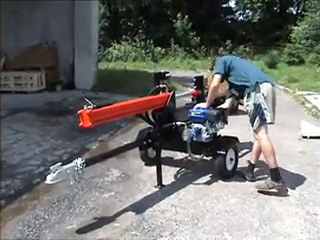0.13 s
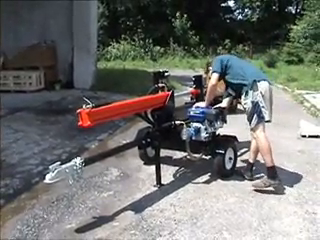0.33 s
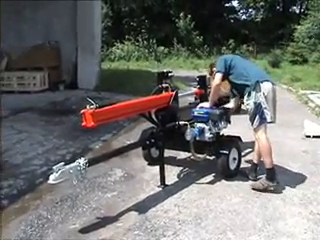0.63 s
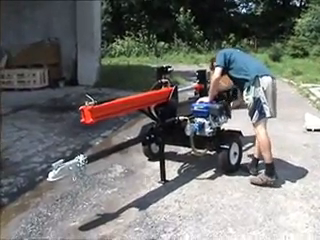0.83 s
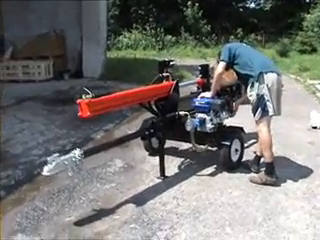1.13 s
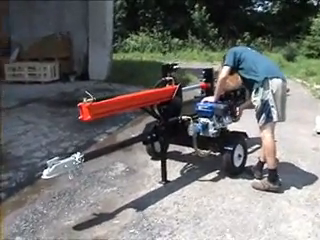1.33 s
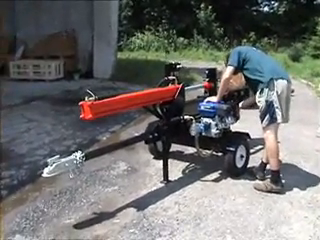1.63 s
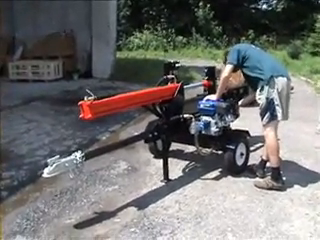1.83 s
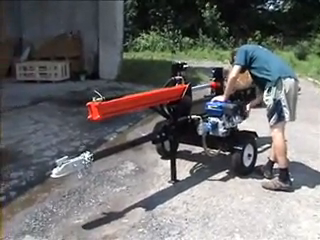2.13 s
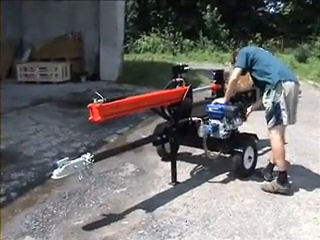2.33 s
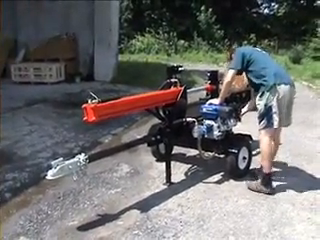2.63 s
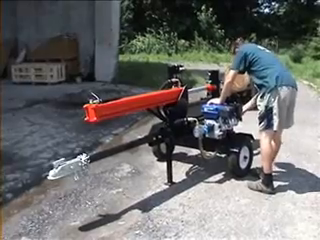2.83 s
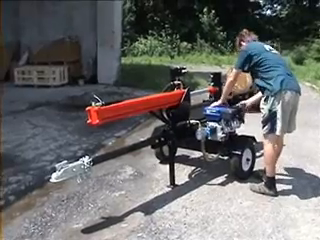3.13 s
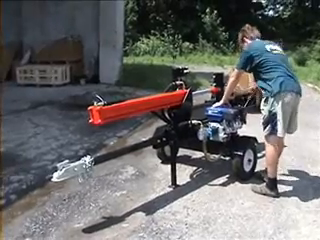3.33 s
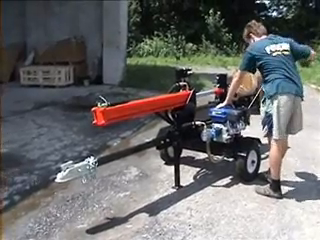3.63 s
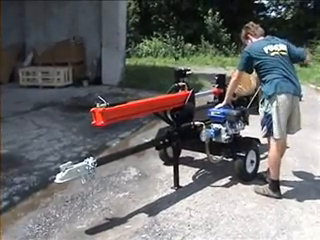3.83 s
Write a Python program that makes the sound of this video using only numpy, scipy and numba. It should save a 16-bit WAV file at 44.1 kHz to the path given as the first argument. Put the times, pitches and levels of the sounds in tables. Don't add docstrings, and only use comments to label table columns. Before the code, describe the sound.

A starter rope drags a small engine round with clacks, thumps and hollow metal rattle, without catching; beforehand, shoes crunch gravel and loose metal clacks, with birdsong in an open yard, microphone a few metres away.

```python
import sys
import numpy as np
from scipy import signal
from scipy.fft import rfft, irfft
from scipy.io import wavfile
from scipy.ndimage import uniform_filter1d
from numba import njit

SR = 44100
rng = np.random.default_rng(int(sys.argv[2]) if len(sys.argv) > 2 else 0)


def waveform_to_disk(signal):
    frames = np.transpose(np.atleast_2d(signal))
    scaled = np.clip(frames, -1, 1) * 32767
    samples = np.round(scaled).astype(np.int16)
    wavfile.write(sys.argv[1], SR, samples)


def attenuation_scalar(level_db):
    decades = np.asarray(level_db, float) / 20
    return 10 ** decades


N = 176400

TOP_HZ = 15600
THIN_HZ = 205
OPPOSITE = np.array([[1], [-1]])


def unit(x):
    return x / np.sqrt(np.mean(x ** 2))


def peak(x):
    return x / np.abs(x).max()


def curve(rows, axis=1):
    return np.interp(np.arange(N) / SR, np.array(rows)[:, 0], np.array(rows)[:, axis])


def colour(x, rows):
    f, shape = np.fft.rfftfreq(1024, 1 / SR), np.array(rows)
    log_gain = np.interp(np.log(f + 1), np.log(shape[:, 0]), shape[:, 1]) * np.log(10) / 20
    cepstrum = irfft(log_gain)
    cepstrum[1:512] *= 2
    cepstrum[513:] = 0
    return signal.fftconvolve(x, irfft(np.exp(rfft(cepstrum))))[:len(x)]


def thin(x):
    return signal.sosfilt(signal.butter(2, THIN_HZ, "high", fs=SR, output="sos"), x)


def ring(x, hz, t60):
    r = 1000 ** (-1 / (max(t60, .002) * SR))
    turn = 2 * np.pi * hz / SR
    return signal.lfilter([np.sin(turn)], [1, -2 * r * np.cos(turn), r * r], x)


@njit
def svf(x, hz, width):
    y, b, l = np.empty(len(x)), 0., 0.
    for i in range(len(x)):
        g, k = np.tan(np.pi * hz[i] / SR), width / hz[i]
        v = (b + g * (x[i] - l)) / (1 + g * (g + k))
        b, l, y[i] = 2 * v - b, l + 2 * g * v, k * v
    return y


def walk(rate):
    k = int(SR / rate)
    steps = np.repeat(rng.standard_normal(N // k + 1), k)
    return 0.72 * uniform_filter1d(uniform_filter1d(steps, k), k)[:N]


def grains(per_s, spread_db):
    chance, sign, size = rng.random((3, N))
    size = np.minimum(-np.log(size + 1e-9), 4)
    return unit((chance < per_s / SR) * np.sign(sign - .5) * attenuation_scalar(spread_db * size))


def add(out, x, s):
    i = int(s * SR)
    out[i:i + len(x)] += x[:N - i]


def tail(x, t60):
    t, same = np.arange(SR // 2) / SR, .45
    h = rng.standard_normal((2, len(t))) * 1000 ** (-t / t60) * np.minimum(t / 0.0033, 1)
    h[1] = same * h[0] + np.sqrt(1 - same ** 2) * h[1]
    return signal.fftconvolve(x[None], h / np.sqrt((h ** 2).sum(axis=1, keepdims=True)), axes=1)[:, :N]


# f/Hz, level/dB per Hz
LEAVES = [(80, -8), (300, -10), (1200, -11.5), (2300, -22), (6000, -23), (12000, -37), (16000, -44)]
# f/Hz, level/dB
LEAVES_SIDE = [(80, -9.5), (400, -4), (3000, 2.5)]
# f/Hz, level/dB
TAPE_WHINE = [(6675, -78.5), (8947, -80.5), (11730, -78)]
# t/s, length/s, first f/Hz, last f/Hz, level/dB
INSECT = (0.7, 1.2, 501, 618.5, -61)
LEAVES_DB = -55


def air():
    t = np.arange(N) / SR
    mid, side = (colour(rng.standard_normal(N), LEAVES) for _ in range(2))
    bed = (mid + colour(side, LEAVES_SIDE) * OPPOSITE) / np.std(mid) * attenuation_scalar(LEAVES_DB + 0.2 * walk(4.1))
    whine = sum(attenuation_scalar(db + 8) * np.sin(2 * np.pi * hz * t + .5 * walk(22.1)) for hz, db in TAPE_WHINE)
    start_s, length_s, first_hz, last_hz, db = INSECT
    passed = np.clip((t - start_s) / length_s, 0, 1)
    hz = first_hz + (last_hz - first_hz) * passed + 6 * walk(12.9)
    swell = attenuation_scalar(db + 4 * walk(12.2)) * np.sin(np.pi * passed ** .4)
    return bed + whine + swell * np.sin(2 * np.pi * np.cumsum(hz) / SR)


# f/Hz, level/dB per Hz
STONE_CRACK = [(600, -50), (2500, -1), (6000, 0), (16000, -17)]
STONE_T60_S, STONE_CRACK_T60_S = .11, .012


def clicks(rows):
    out, t = np.zeros(N), np.arange(SR // 8) / SR
    for s, db, hz, crack_db in rows:
        hit, snap = rng.standard_normal((2, len(t)))
        body = ring(hit, hz, 6 / hz) + .6 * ring(hit, 1.5 * hz, 5 / hz) + .5 * ring(hit, 3.1 * hz, 6 / hz)
        ping = 1.18 * np.sin(2 * np.pi * hz * t) * np.exp(-t * hz / 2)
        body = (peak(body[::-1]) + ping) * 1000 ** (-t * (hz / 1000) ** 2 / STONE_T60_S)
        crack = colour(snap * 1000 ** (-t / STONE_CRACK_T60_S), STONE_CRACK)
        add(out, attenuation_scalar(db - 14.5) * (body * 4.06 + attenuation_scalar(crack_db) * crack), s)
    return out


# t/s, peak level/dB, ring f/Hz, crack level/dB
STONES = [(0.019, -22, 2210, -32), (0.343, -34, 3960, 11), (0.462, -37, 2490, 16), (0.558, -33, 4400, 27),
          (0.646, -26, 2730, -2), (0.754, -34.5, 1450, 17.5), (0.977, -24, 2420, -13),
          (1.181, -20, 3320, -18), (1.22, -37.5, 5060, 24), (1.247, -41, 5000, 19.5),
          (1.377, -19.5, 2690, 6), (1.412, -32, 3000, -1), (1.445, -31, 3500, -8), (1.493, -27, 2740, 7),
          (1.453, -27.5, 2100, -9), (1.466, -30, 2520, -7), (1.478, -22, 3010, -23), (1.58, -31, 3030, 2),
          (1.66, -33.5, 1340, 21.5), (1.697, -29, 1420, 18), (1.709, -19.5, 3200, 5),
          (1.782, -27.5, 1830, -22), (1.75, -31.5, 2970, 17), (1.83, -36.5, 795, 9), (1.871, -30.5, 994, 1),
          (1.889, -32, 1520, 6), (1.91, -33.5, 1320, 24), (1.995, -25, 3020, 14.5)]
# t/s, level/dB
SHOES = [(0, -57), (.4, -62.5), (.47, -51.5), (.8, -54.5), (1.3, -54.5), (1.45, -50), (1.72, -44),
         (1.8, -54.5), (1.89, -48), (1.98, -47), (2.12, -54), (2.3, -66.5), (2.58, -51), (2.65, -45.5),
         (2.95, -60.5), (3.12, -79), (3.2, -86)]
# f/Hz, level/dB per Hz
GRIT = [(150, -14), (400, -3), (1200, 3), (4000, -1.5), (16000, -14)]
GRAIN_HZ = 900, 2560, 7200
GRAINS_PER_S, GRAIN_SPREAD_DB = 2000, 4


def gravel():
    sizes = np.zeros(N)
    for hz in GRAIN_HZ:
        band = signal.butter(1, [hz / 2, hz * 2], "band", fs=SR, output="sos")
        sizes += signal.sosfilt(band, grains(GRAINS_PER_S, GRAIN_SPREAD_DB) * attenuation_scalar(4.5 * walk(60)))
    grit = unit(colour(sizes + .5 * rng.standard_normal(N), GRIT))
    return grit * attenuation_scalar(curve(SHOES) + 2 * walk(36.74)) + clicks(STONES)


# t/s, length/s, level/dB
GUSTS = [
    (0.139, 0.032, -32),
    (0.605, .03, -46.5),
    (1.631, 0.047, -44),
    (1.796, 0.069, -39.5),
    (2.163, 0.065, -48),
    (2.527, 0.37, -53),
]
WIND_DB, WIND_HZ, WIND_LEFT_DB, WIND_SAME = -68, 70, 1, 0.45


def wind():
    t = np.arange(N) / SR
    gust = attenuation_scalar(WIND_DB + 5.1 * walk(2.8))
    gust += sum(attenuation_scalar(db) * np.exp(-((t - s) / length) ** 2) for s, length, db in GUSTS)
    rumble = [(20, -7), (WIND_HZ, 0), (130, -12), (400, -45)]  # f/Hz, level/dB
    same, apart = (unit(colour(rng.standard_normal(N), rumble)) for _ in range(2))
    return gust * (WIND_SAME * same + apart * OPPOSITE) * attenuation_scalar(WIND_LEFT_DB * OPPOSITE)


# t/s, level/dB, low f/Hz, high f/Hz, t60/s
CLACKS = [
    (.339, -28.5, 1010, 1400, 0.021),
    (.343, -26, 980, 3260, 0.11),
    (.557, -31.5, 990, 3280, 0.21),
    (0.56, -31, 1623, 1900, 0.11),
    (0.646, -34.5, 1555, 2750, 0.052),
    (1.325, -29.5, 533, 990, 0.22),
    (1.376, -26, 878, 2400, .13),
    (1.38, -28, 1540, 1930, 0.073),
]
CLACK_PUSH_S, CLACK_HIGH_DB, CLACK_RING = .005, -4, .45


def clacks():
    out, t = np.zeros(N), np.arange(SR // 8) / SR
    for s, db, low_hz, high_hz, t60 in CLACKS:
        push = rng.standard_normal(len(t)) * np.minimum(t / 0.0013, 1) * np.exp(-t / CLACK_PUSH_S)
        low = ring(push, low_hz, CLACK_RING * t60) + .7 * ring(push, 1.3 * low_hz, .2 * t60)
        high = ring(push, high_hz, .1 * t60)
        add(out, attenuation_scalar(db) * (peak(low) + attenuation_scalar(CLACK_HIGH_DB) * peak(high)), s)
    return out


# t/s, length/s, first f/Hz, last f/Hz, level/dB
SONG = [(0.478, 0.065, 4150, 4630, -55), (0.843, 0.051, 4080, 4380, -52.5), (0.864, 0.24, 3607, 2673, -49),
        (1.381, 0.21, 5600, 5340, -56), (1.441, 0.15, 5200, 4210, -53), (2.02, 0.17, 5630, 5470, -55.5),
        (2.039, 0.057, 4550, 4500, -50), (2.101, 0.21, 4990, 4170, -53.5), (2.492, 0.1, 5500, 5530, -60.5),
        (2.508, 0.3, 3770, 2713, -51), (3.575, 0.15, 5780, 5480, -52), (3.697, .14, 4900, 4400, -54),
        (3.89, 0.072, 5450, 5500, -52)]
TRILL_PER_S, TRILL_SWING_HZ, TRILL_TURN_HZ = 39, 410, 5010
TREES_T60_S, TREES_DB, RASP_HZ = 0.53, 8, 153


def thrush():
    out = np.zeros(N)
    for s, length, first_hz, last_hz, db in SONG:
        t = np.arange(int(length * SR)) / SR
        swing = TRILL_SWING_HZ / (1 + (first_hz / TRILL_TURN_HZ) ** 8)
        turn = 2 * np.pi * (TRILL_PER_S * t + rng.random())
        fall = last_hz + (first_hz - last_hz) * (1 - t / length) ** 2.3
        hz = fall + swing * signal.sawtooth(turn, 0) + RASP_HZ * walk(400)[:len(t)]
        breath = np.sin(np.pi * (t / length) ** 0.39) ** 1.46 * (1 - np.cos(turn)) ** 2 / 2
        add(out, attenuation_scalar(db) * breath * np.sin(2 * np.pi * np.cumsum(hz) / SR), s)
    return out * attenuation_scalar(1.5 * OPPOSITE) * 1.53 + attenuation_scalar(TREES_DB) * tail(out, TREES_T60_S)


# t/s, level/dB, f/Hz, t60/s
PUFFS = [(2.643, -25.5, 417, 0.027), (2.68, -13.5, 368, 0.013), (2.699, -32.5, 400, 0.035),
         (2.799, -19, 504, 0.02), (2.824, -25, 457, 0.022), (3.268, -13, 303, 0.034),
         (3.273, -25, 425, 0.089), (3.569, -7, 186, 0.014), (3.666, -30, 223, 0.07),
         (3.712, -11.5, 117, 0.02), (3.873, -32.5, 237, 0.24)]


def puffs():
    out, t = np.zeros(N), np.arange(SR // 7) / SR
    for s, db, hz, t60 in PUFFS:
        add(out, attenuation_scalar(db) * np.sin(2 * np.pi * hz * t) * np.minimum(t / 0.0099, 1) * 1000 ** (-t / t60), s)
    return out


# t/s, peak level/dB, ring f/Hz, crack level/dB
GRIP = [
    (2.644, -31.5, 3320, 15),
    (2.724, -22.5, 1820, 8),
    (2.76, -26, 3230, -5),
    (2.773, -24.5, 1144, 13.5),
    (2.781, -32, 3260, -2),
    (2.802, -23.5, 3580, 2),
    (2.886, -26.5, 1210, 5),
    (2.915, -30, 1530, 8),
]


def grip():
    return clicks(GRIP)


# t/s, level/dB, hollow f/Hz
DRAG = [(2.85, -62, 940), (2.95, -38, 924), (3.04, -45, 930), (3.09, -40, 910), (3.14, -53.5, 705),
        (3.22, -52.5, 760), (3.3, -34, 740), (3.41, -40.5, 610), (3.47, -36.5, 980), (3.55, -31.5, 1120),
        (3.62, -36, 860), (3.66, -35.5, 820), (3.73, -39.5, 900), (3.8, -42, 1040), (3.86, -43, 900),
        (3.91, -34, 940), (3.96, -38, 1130), (4, -36, 970)]
# f/Hz, level/dB per Hz
WHIR = [(200, -7.5), (500, 0.5), (950, -0.5), (1600, -9), (2800, -17), (7000, -19.5), (16000, -35)]
RATTLES_PER_S, RATTLE_SPREAD_DB, DRAG_FLICKER_DB = 1000, 3.5, 2.2
WHIR_DB, HOWL_DB, HOWL_WIDTH_HZ, HOWL_WANDER = -8, -1, 204, 0.076


def rope():
    drag = attenuation_scalar(curve(DRAG) + DRAG_FLICKER_DB * walk(90)) * (np.arange(N) / SR > DRAG[0][0])
    rub = .5 * grains(RATTLES_PER_S, RATTLE_SPREAD_DB) + rng.standard_normal(N)
    hollow_hz = curve(DRAG, axis=2) * (1 + HOWL_WANDER * walk(25.03))
    howl = unit(svf(rub, hollow_hz, float(HOWL_WIDTH_HZ)))
    whir = unit(colour(rub, WHIR))
    return (attenuation_scalar(WHIR_DB) * whir + attenuation_scalar(HOWL_DB) * howl) * drag, rub * drag


# t/s, level/dB, contact length/s, crack level/dB, ring f/Hz
KNOCKS = [(2.944, -35, 0.0086, -5, 2850), (2.992, -43, 0.011, 3.5, 2980), (3.09, -37.5, .006, -4, 2680),
          (3.227, -23, 0.016, -15, 2000), (3.236, -22.5, 0.018, 2, 4700), (3.267, -18, 0.0081, -0.5, 8100),
          (3.325, -55, 0.008, -19, 2000), (3.475, -26.5, 0.0027, -5, 2180), (3.513, -32, 0.014, -7, 2440),
          (3.568, -37.5, 0.0091, 6.5, 5570), (3.61, -45, 0.0046, -14, 2000),
          (3.662, -35.5, 0.0088, 4, 12000), (3.708, -28.5, 0.0093, -9, 1820),
          (3.82, -31.5, 0.0047, -5, 2190), (3.869, -33, 0.0072, -15, 1990), (3.872, -37, 0.012, 6.5, 9100),
          (3.891, -38, 0.0045, -2, 2940), (3.942, -42.5, 0.017, 2, 2740), (3.956, -40.5, 0.012, 8, 4800)]
# f/Hz, level/dB per Hz
METAL_CRACK = [(1200, -3), (3500, -7), (8200, -7), (12500, -12), (16000, -7.5)]
# f/Hz, level/dB, t60/s
PAWL = [(2062, -4, .06), (2782, -3, 0.039), (3575, -7, 0.036), (5645, -16, 0.067), (6770, -15, 0.017),
        (8100, -3.5, 0.029), (8250, -14, 0.037), (10070, -11, 0.04), (12100, -14, 0.028)]
PAWL_DB, PAWL_DB_PER_OCT = -17.5, 9.5
# f/Hz, level/dB, t60/s
COWL = [(453, -10.5, 0.19), (530.3, -15, 0.57), (651, -8.5, 0.14), (767, -8, 0.64), (908, 2, 0.083),
        (985, 2.5, 0.07), (1058, -2.5, 0.076), (1120, 5, 0.057), (1453, 2.5, 0.022)]
COWL_DB, RUB_DB, CRACK_DB = -23, -19, 11


def pawl_ring(hit, pitch_hz):
    out = np.zeros(len(hit))
    for hz, db, t60 in PAWL:
        out += attenuation_scalar(db - PAWL_DB_PER_OCT * abs(np.log2(hz / pitch_hz))) * ring(hit, hz, t60)
    return out


def starter():
    push, crack, pawls = np.zeros((3, N))
    t = np.arange(SR // 7) / SR
    for s, db, length, crack_db, pitch_hz in KNOCKS:
        contact = np.minimum(t / 0.0014, 1) * np.exp(-(t / length) ** 2) * attenuation_scalar(db)
        shove, hit = rng.standard_normal((2, len(t))) * contact
        add(push, shove * np.sqrt(0.0044 / length), s)
        dulled = signal.lfilter(*signal.butter(2, min(1.8 * pitch_hz, TOP_HZ), fs=SR), hit)
        add(crack, dulled * attenuation_scalar(crack_db), s)
        add(pawls, attenuation_scalar(crack_db) * pawl_ring(hit, pitch_hz), s)
    rope_sound, rub = rope()
    shake = push + attenuation_scalar(RUB_DB) * rub
    cowl = sum((-1) ** k * attenuation_scalar(db) * ring(shake, hz, t60) for k, (hz, db, t60) in enumerate(COWL))
    metal = attenuation_scalar(COWL_DB) * cowl + colour(attenuation_scalar(CRACK_DB) * crack, METAL_CRACK) + attenuation_scalar(PAWL_DB) * pawls
    return thin(metal + rope_sound)


YARD_T60_S, YARD_DB, PORT_LAG_S = 0.37, -9, .00001


def place(x, pan_db):
    turn = np.pi * np.fft.rfftfreq(N, 1 / SR) * PORT_LAG_S * OPPOSITE
    return irfft(rfft(x) * np.exp(1j * turn), N) * attenuation_scalar(np.array([pan_db, -pan_db]).reshape(2, -1) / 2)


def scene():
    feet = thin(gravel() + clacks() + grip())
    engine = puffs() + starter()
    near = place(feet, 0.46 + 9.4 * walk(6.18)) + place(engine, -1.8)
    return air() + near + attenuation_scalar(YARD_DB) * tail(feet + engine, YARD_T60_S) + wind() + thrush()


def roll_off(x):
    return signal.sosfilt(signal.butter(12, 16490, fs=SR, output="sos"), x)


def record(dry):
    low_pass = signal.cheby1(12, .5, TOP_HZ, fs=SR, output="sos")
    mix = signal.sosfilt(low_pass, dry)
    return roll_off(mix)


dry = scene()
out = record(dry)
waveform_to_disk(out)
```